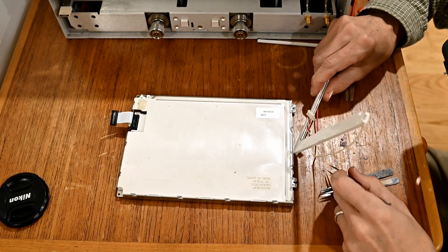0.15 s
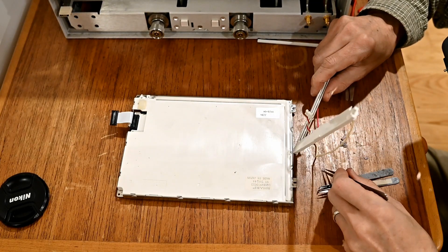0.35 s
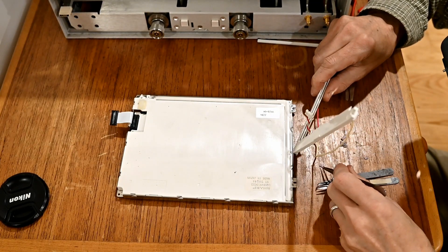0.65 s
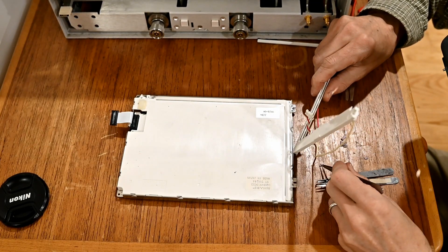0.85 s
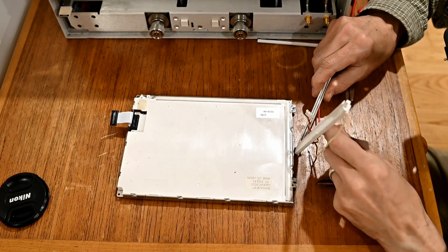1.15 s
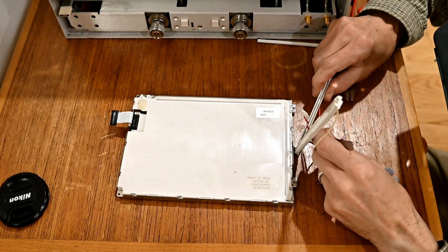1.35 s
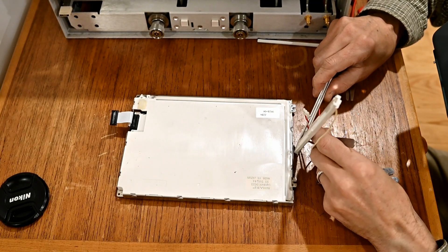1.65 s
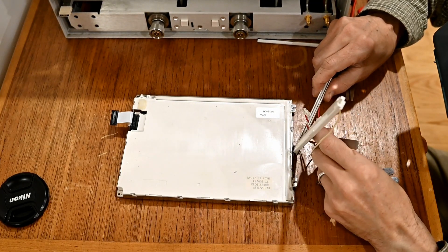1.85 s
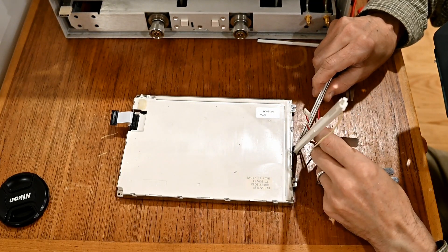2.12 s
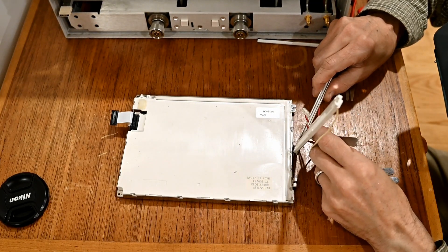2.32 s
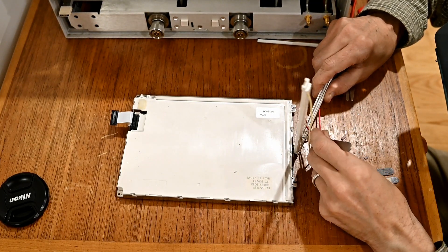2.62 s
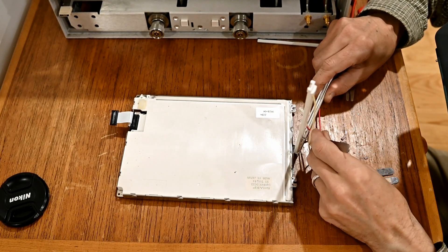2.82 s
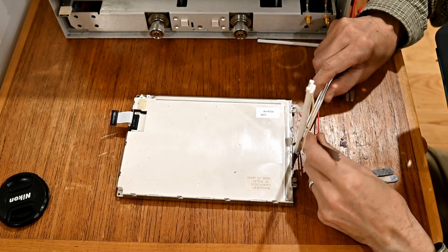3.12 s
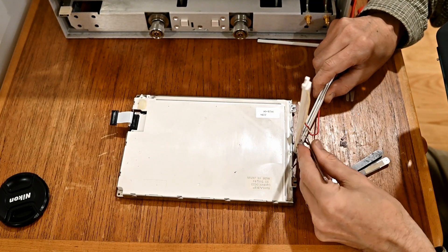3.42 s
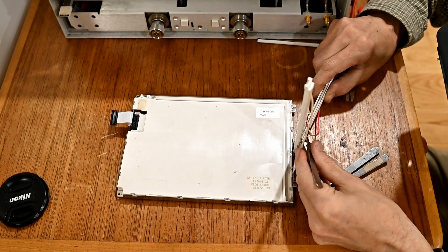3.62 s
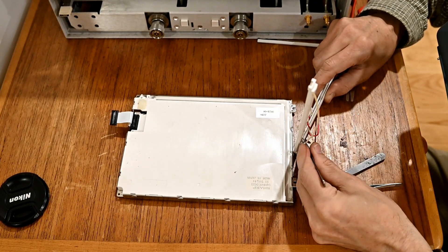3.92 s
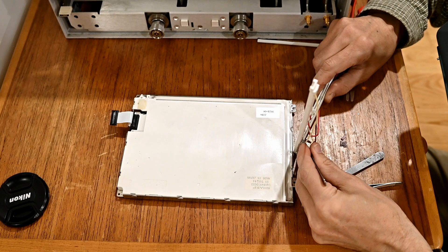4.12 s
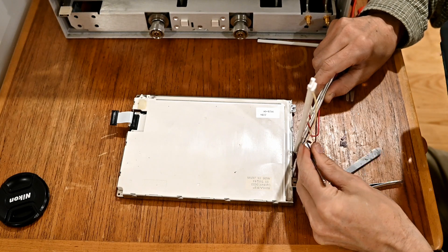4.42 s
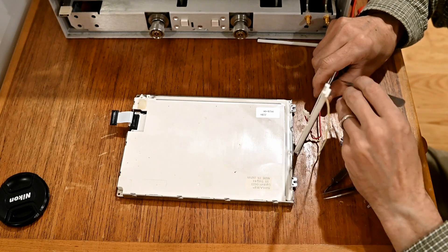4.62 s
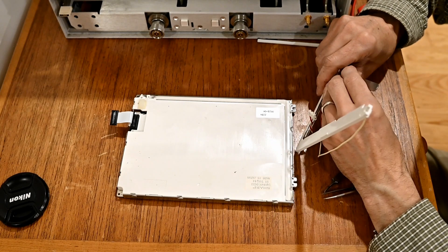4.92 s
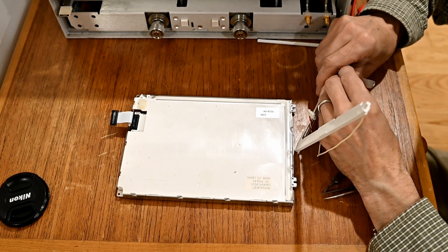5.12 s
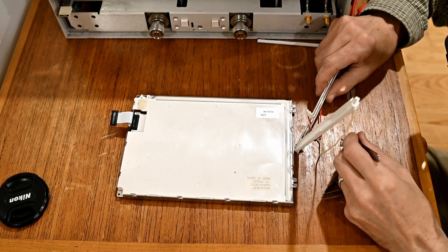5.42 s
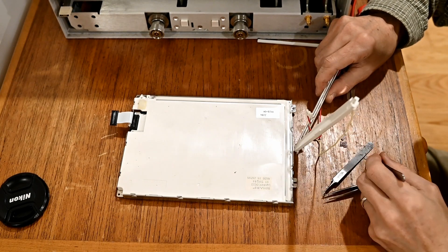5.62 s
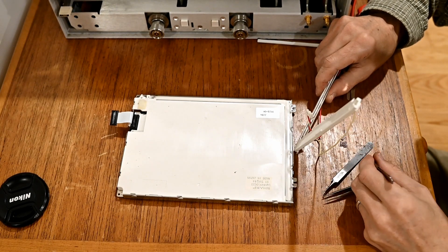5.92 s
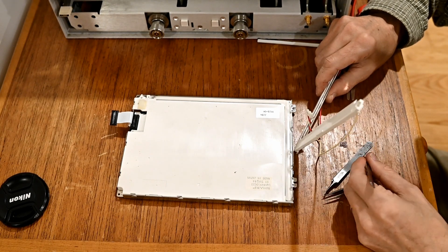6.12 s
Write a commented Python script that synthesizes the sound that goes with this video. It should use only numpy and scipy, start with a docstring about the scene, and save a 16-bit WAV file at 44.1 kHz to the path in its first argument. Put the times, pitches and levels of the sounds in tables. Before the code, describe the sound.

A small quiet indoor room, heard close in stereo, with a very faint airy hush and barely audible thin steady tones. Sleeves and fingers rustle softly on and off. From 0.04 to 0.4 seconds steel tools touch in a rapid cluster, sharpest at 0.26, with a brief drag. Sparse faint ticks and scrapes follow until a firmer clink and a crisp foil snap at 1.9. From 2.15 to 3.1 foil and plastic crackle in tiny snaps and slides, ending with a strong snap at 3.07. More snapping comes around 3.5. At 3.92 two nearly joined, very bright steel clicks are the loudest moment. Another crackle and tight clink cluster falls at 4.4 to 4.75, with a rustle. Afterwards only light touches remain, a faint slide at 5.4, a short metal drag and tick at 5.77, and a last tiny tick at 6.0. Every contact is dry and very short, with a slight room echo.

```python
"""Hands work with steel tweezers and small parts on a wooden bench in a small quiet room.
A faint hush with three thin tones lies under everything, and sleeves and fingers rustle on and off.
First steel tools clink and drag on the bench; from about two seconds foil and plastic also snap and slide.
The hardest clinks come near four seconds, and small touches and drags go on until about six.
Touches are bursts of noise that ring decaying sines; hush and rustle are filtered noise; a short echo is added."""
import sys
import numpy as np
from scipy import signal
from scipy.io import wavfile

SR = 44100
rng = np.random.default_rng(int(sys.argv[2]) if len(sys.argv) > 2 else 0)


def generate_wav(signal):
    """Clip the signal to [-1, 1] and save it as 16-bit WAV at the path in sys.argv[1]."""
    frames = np.transpose(np.atleast_2d(signal))
    scaled = np.clip(frames, -1, 1) * 32767
    pcm = np.round(scaled).astype(np.int16)
    wavfile.write(sys.argv[1], SR, pcm)


N = 276066  # length in samples

# In the touch tables level_db is a relative loudness: a longer touch also comes out louder.
# Tilt is the treble slope around 4000 Hz. Dullness weakens both far ends; below zero it counts as none.

# Room hush, shape of its spectrum: pitch_hz, relative_level_db (per Hz)
HUSH_SPECTRUM = [(15, -50), (25, -15), (108, -12.5), (313, -0.5), (358, -7.5), (410, -6), (524, 0),
                 (1360, -1.5), (1470, 0), (1730, 6.5), (1980, -5), (15200, -5.5), (16500, -35)]
# How alike left and right are in the hush: pitch_hz, likeness (1 = the same, 0 = unrelated)
HUSH_LIKENESS = [(60, 0.68), (240, 0.88), (950, 0.81), (3770, 0.15), (15000, 0.18)]
# Thin steady tones in the hush: pitch_hz, level_db (rms)
HUSH_TONES = [(360.7, -88), (527.6, -87), (872.1, -87)]
# Loudness curve of moving sleeves and fingers: time_s, level_db
RUSTLE_LEVELS = [(0.0, -67), (0.19, -64.5), (0.37, -75.5), (1.62, -75), (1.85, -74.5), (2.21, -73.5),
                 (3.33, -71.5), (3.47, -67), (4.39, -74), (4.53, -68.5), (4.71, -86), (4.76, -60.5),
                 (5.04, -73.5), (5.2, -73), (5.67, -68), (5.94, -76.5), (6.26, -73)]
# Steel tools touching: start_s, level_db, tilt_db_per_octave, dullness_db_per_octave_squared,
# bench_db (bench knock compared with the steel)
CLINK_EVENTS = [(0.0402, -34, -3.5, -3, -8), (0.149, -45, 0, -2, -14), (0.1905, -42.5, -4, 1, -19),
                (0.207, -32.5, -1.5, 0.2, -28), (0.2568, -18.5, 1, 0.5, -31.5),
                (0.2694, -27.5, 1.2, -2.3, -19), (0.2933, -30.5, -2.5, 13, -31),
                (0.3165, -38, -2.5, 2, -29), (0.3577, -41, -14, 8, -17), (0.3704, -42, -14, 6, -9.5),
                (0.3835, -48, -4, 3.5, -19), (0.846, -49, -14, 4.5, -19), (0.9276, -50, -3, -2, -23),
                (1.188, -44, -7, 2.5, -19), (1.3033, -48, -3.5, 2.5, -10), (1.326, -46, -5, 3.5, -13),
                (1.36, -51, 3, 8, -22), (1.44, -53.5, -2, 4, -12), (1.693, -49, -4, -4, -9),
                (1.803, -51.5, -16, 7, -17), (1.8746, -31.5, -2.5, -2.5, -11.5),
                (1.946, -43.5, -9, 3.5, -19), (3.4184, -38.5, 3, 3.5, -31), (3.4328, -36, -2, 5.5, -10.5),
                (3.8426, -39, -5, 1.5, -9), (3.894, -35.5, 5, 36, -16), (3.919, -8.5, 5, 5.8, -31),
                (3.929, -12, 3.5, 1.2, -41), (4.081, -46, -17, 11.5, -33.5),
                (4.2172, -50.5, -7.5, 2.2, -10), (4.4886, -45, -6.5, 4.5, -13), (4.6343, -23.5, 0, 16, -34),
                (4.6368, -20.5, 2.5, 3.5, -33), (4.6404, -22, -4.2, 5, -30), (4.7454, -21.5, -4, 5.5, -36),
                (4.8523, -43, 6, 5, -12), (4.879, -41.5, 2, 1.5, -11), (4.93, -51, -9, 3.5, -8),
                (4.99, -54, -16, -2, -6), (5.095, -53.5, -17, 5.5, -12), (5.1312, -48.5, -2.5, 4, -21),
                (5.25, -51.5, -17, -5, -7), (5.28, -42.5, -3.5, 1, -19), (5.2964, -49, -6, 2, -21),
                (5.624, -48.5, -11, 8, -26), (5.7739, -36, -5, -2, -24), (5.7994, -42, -12, 8, -18),
                (6.002, -52.5, -10, 2, -13)]
# Steel dragged over the bench: start_s, level_db, tilt_db_per_octave
DRAG_EVENTS = [(0.162, -48, 22), (0.698, -45.5, 1), (0.722, -49, 0), (0.937, -45.5, -4), (5.6014, -48, -13),
               (5.7638, -33.5, -8)]
# Foil and plastic snapping: start_s, level_db, tilt_db_per_octave, thud_db (thud compared with the foil)
SNAP_EVENTS = [(1.891, -16, 1.5, -25), (2.1466, -26, 2.2, -12), (2.205, -37, -1.3, -18),
               (2.2453, -40, 8, -25), (2.2943, -37.5, 0, -16), (2.3316, -44, 6, -24),
               (2.354, -42, -1.5, -19), (2.3971, -38, 3, -25), (2.5247, -49, 8, -18), (2.5496, -38, 3, -8),
               (2.587, -40, -2, -25), (2.5957, -37.5, 1.5, -4.5), (2.6865, -38.5, 0.5, -32),
               (2.7038, -40.5, 0.5, -39), (2.8314, -35.5, 1, -16), (2.9451, -36.5, -1, -24),
               (3.0731, -16, 1.2, -16.5), (3.496, -35, -2.3, -20), (3.5267, -23.5, 0.5, -18),
               (3.5944, -37, 6, -36), (3.6157, -45, 9, -30), (3.6704, -45, 4, -28), (3.704, -45, 11, -30),
               (3.716, -43, 11, -30), (3.6855, -46, -1, -28), (3.8272, -48, -4, -31), (4.3832, -40, 3, -33),
               (4.4057, -39, 2, -31), (4.566, -36.5, 11, -24), (4.588, -30.5, -1.5, -13)]
# Foil sliding: start_s, level_db, length_s, tilt_db_per_octave
SLIDE_EVENTS = [(2.517, -49.5, 0.022, -1), (2.5514, -44.5, 0.024, -1.2), (2.571, -45.5, 0.015, -1),
                (2.5997, -30, 0.032, 1.5), (2.6214, -52, 0.021, 2), (2.818, -46, 0.0086, 2.5),
                (2.911, -54.5, 0.015, 3), (2.969, -53, 0.014, 1), (3.038, -44, 0.023, 3),
                (3.1093, -35, 0.0079, 2), (3.3944, -45, 0.015, 0.5), (3.517, -34.5, 0.01, -0.3),
                (3.5323, -38.5, 0.016, -0.5), (3.645, -32, 0.0085, 0.8), (4.4398, -38.5, 0.01, 2.2),
                (4.797, -53.5, 0.064, 0.5), (5.4165, -51.5, 0.037, 0.5), (5.449, -54, 0.034, 0.5)]
# Ways the steel tools ring: pitch_hz, level_db, t60_s (time to fade by 60 dB)
STEEL_MODES = [(1254, -10, .02), (1500, -10, .008), (1970, -7, .006), (2570, -5, .007), (3100, -4, .006),
               (3630, -4, .005), (4070, -3, .007), (4500, -3, .006), (4990, -3, .005), (5640, -4, .006),
               (6400, -3, .004), (7200, -3, .004), (8100, -3, .003), (9150, -3, .004), (10100, -2, .003),
               (11400, -2, .0035), (12400, -2, .003), (13400, -2, .003), (14400, -2, .003),
               (15400, -2, .003)]
# Ways the wooden bench rings: pitch_hz, level_db, t60_s
BENCH_MODES = [(420, -10, .035), (650, -1, .08), (1100, -5, .03)]
# Ways the foil and plastic ring: pitch_hz, level_db, t60_s
FOIL_MODES = [(450, -9, .008), (900, -6, .004), (1500, -5, .004), (2200, -4, .003), (3300, -3, .002),
              (4800, -1, .0015), (6600, -1, .0015), (8200, -1, .0015), (9800, -1, .0015),
              (11500, -1, .0015), (13200, -1, .0015), (15000, -1, .0015)]
# Ways the casing under the foil rings: pitch_hz, level_db, t60_s
CASING_MODES = [(39.8, 4, 0.028), (89.5, -4, 0.03), (194, 6, 0.014), (320, -15, 0.017), (676, -3.5, 0.014)]

HUSH_DB = -65.5  # rms level, without the tones
CLINK_CONTACT_S, CONTACT_SHRINK = 0.0031, 0.084  # length at -40 dB; dB shorter per dB harder
DRAG_CONTACT_S, DRAG_DULL_DB, DRAG_BENCH_DB = 0.012, 12, -36
SNAP_CONTACT_S, SNAP_DULL_DB = 0.0013, 0.4
SLIDE_DULL_DB, SLIDE_THUD_DB = 0, -23
ROOM_T60_S, TREBLE_T60_S, WALL_CUT_HZ, ROOM_DB = 0.18, 0.21, 17000, -4  # treble fades by both times
CUTOFF_HZ = 16800


def from_db(db):
    """Turns decibels into a plain multiplier."""
    return 10 ** (np.asarray(db) / 20)


def rms_one(x):
    """Scales a sound to an rms (average strength) of 1."""
    return x / np.sqrt(np.mean(x ** 2) + 1e-20)


def at_hz(points, hz):
    """Reads a table of pitches and values, moving between pitches as the ear does, on a log scale."""
    pitches, values = np.transpose(points)
    return np.interp(np.log(hz), np.log(pitches), values)


def drift(rate_hz):
    """Makes slow random wandering of spread 1 by smoothing noise twice, one value per 40 samples."""
    step = 40
    r = np.exp(-2 * np.pi * rate_hz * step / SR)
    noise = rng.standard_normal(N // step + 2002)
    slow = signal.lfilter([1], [1, -2 * r, r * r], noise)[2000:]  # skip the filter's start-up
    return np.interp(np.arange(N) / step, np.arange(len(slow)), rms_one(slow))


def rings(modes, detune=1):
    """Gives each mode a fading sine that swells over its first cycle or two; neighbours are flipped."""
    hz, db, t60 = np.transpose(modes)[:, :, None]
    t = np.arange(SR // 10) / SR
    flip = (-1) ** np.arange(len(modes))[:, None]
    fade = from_db(db - 60 * t / t60)
    swell = 1 - np.exp(-hz * t)
    return flip * fade * swell * np.sin(2 * np.pi * hz * detune * t)


def touches(events, modes, under, thin_hz, grain_db, rise, squareness):
    """Makes each touch a chatter of tiny impacts that rings the object and what lies under it."""
    out = np.zeros((2, N + SR))
    t = np.arange(SR // 10) / SR
    thin = signal.butter(4, thin_hz, "high", fs=SR, output="sos")  # small parts give off no bass
    under_rings = rings(under)
    octaves = np.log2(np.array(modes)[:, 0] / 4000)
    for start_s, level_db, contact_s, tilt_db, dull_db, under_db in events:
        # The push rises, then dies away; random grains make it rough.
        phase = t / contact_s
        force = (1 - np.exp(-phase / rise)) * np.exp(-phase ** squareness)
        grain_size = np.minimum(rng.exponential(1, len(t)), 5)
        chatter = force * rng.standard_normal(len(t)) * from_db(grain_db * grain_size)

        # Each spot stirs the modes differently, and the grip shifts their pitch a little.
        chance_db = 2 * rng.standard_normal(len(modes))
        colour = from_db(tilt_db * octaves - max(dull_db, 0) * octaves ** 2 + chance_db)
        detune = 1 + chance_db[::-1, None] / 100
        body = signal.sosfilt(thin, colour @ rings(modes, detune))
        below = from_db(4 * rng.standard_normal(len(under))) @ under_rings

        sound = signal.fftconvolve(chatter, body)
        knock = signal.fftconvolve(chatter, below)
        sound = sound / np.linalg.norm(sound)
        knock = from_db(under_db) * knock / np.linalg.norm(knock)
        parts = np.array([sound, knock]) * np.linalg.norm(force) / 2

        # The wide surface below can sound further off centre than the object.
        lean = rng.standard_normal(2) * [0.06, 0.25]
        both_ears = (1 + np.outer([1, -1], lean)) @ parts
        at = round(start_s * SR)
        out[:, at:at + len(sound)] += from_db(level_db) * both_ears
    return out[:, :N]


def hush_tones():
    """Adds up thin sines whose levels waver slowly."""
    t = np.arange(N) / SR
    tones = np.zeros(N)
    for hz, db in HUSH_TONES:
        tones += from_db(db + 1.15 * drift(2)) * np.sqrt(2) * np.sin(2 * np.pi * hz * t)
    return tones


def hush(patchy_db):
    """Builds stereo noise from half-octave bands, each with its own level, flicker and likeness."""
    out = np.zeros((2, N))
    edges = 25 * 2 ** np.arange(0, 9.9, 0.5)
    white = rng.standard_normal((2, 2, N))
    for k, (low, high) in enumerate(zip(edges, edges[1:])):
        band = signal.butter(2, [low, high], "band", fs=SR, output="sos")
        mid, side = signal.sosfilt(band, white[k % 2])  # neighbouring bands use different noise
        hz = np.sqrt(low * high)
        alike = at_hz(HUSH_LIKENESS, hz)
        gain = from_db(at_hz(HUSH_SPECTRUM, hz) + patchy_db * drift(25))
        out += gain * (np.sqrt(1 + alike) * mid + np.sqrt(1 - alike) * side * [[1], [-1]])
    return from_db(HUSH_DB) * rms_one(out) + hush_tones()


def rustle():
    """Lets cloth and skin rub as clumps of tiny dull noise grains."""
    grain_db = 3.0 * np.minimum(rng.exponential(1, N), 5)
    clump_db = 3 * drift(12)
    grains = rng.standard_normal(N) * from_db(grain_db + clump_db)
    band = signal.butter(2, [900, 4500], "band", fs=SR, output="sos")
    level_db = np.interp(np.arange(N) / SR, *np.transpose(RUSTLE_LEVELS))
    return from_db(level_db) * rms_one(signal.sosfilt(band, grains))


def clinks():
    """Makes short steel contacts, the harder the shorter, that also knock the bench."""
    rows = []
    for start_s, db, tilt, dull, bench in CLINK_EVENTS:
        contact_s = CLINK_CONTACT_S * from_db(-CONTACT_SHRINK * (db + 40))
        rows.append((start_s, db, contact_s, tilt, dull, bench))
    return touches(rows, STEEL_MODES, BENCH_MODES, thin_hz=1050, grain_db=3.0, rise=0.067, squareness=1.13)


def drags():
    """Rubs steel on wood in longer touches with soft edges."""
    rows = [(s, db, DRAG_CONTACT_S, tilt, DRAG_DULL_DB, DRAG_BENCH_DB) for s, db, tilt in DRAG_EVENTS]
    return touches(rows, STEEL_MODES, BENCH_MODES, thin_hz=930, grain_db=4.0, rise=0.76, squareness=1.1)


def snaps():
    """Lets a crease give way in a very short burst that knocks the casing."""
    rows = [(s, db, SNAP_CONTACT_S, tilt, SNAP_DULL_DB, thud) for s, db, tilt, thud in SNAP_EVENTS]
    return touches(rows, FOIL_MODES, CASING_MODES, thin_hz=154, grain_db=3.0, rise=0.33, squareness=0.89)


def slides():
    """Scrapes the foil fairly evenly for the length of each slide."""
    rows = [(*slide, SLIDE_DULL_DB, SLIDE_THUD_DB) for slide in SLIDE_EVENTS]
    return touches(rows, FOIL_MODES, CASING_MODES, thin_hz=150, grain_db=3.5, rise=0.4, squareness=3)


def room(x, side_db):
    """Adds dense reflections that die away, top treble fastest, nearly the same left and right."""
    t = np.arange(SR // 3) / SR
    noise = rng.standard_normal((2, len(t))) * np.minimum(t / 0.00045, 1)  # quick fade-in
    dull = signal.sosfilt(signal.butter(1, WALL_CUT_HZ, fs=SR, output="sos"), noise)
    treble = (noise - dull) * from_db(-60 * t / TREBLE_T60_S)
    tail = from_db(-60 * t / ROOM_T60_S) * (dull + treble)
    mid, side = [signal.fftconvolve(x, one / np.sqrt(np.sum(one ** 2)))[:N] for one in tail]
    return from_db(ROOM_DB) * (mid + from_db(side_db) * side * np.array([[1], [-1]]))


def scene():
    """Mixes tools, foil, hands and hush; the tools stir the room more than the muffled foil."""
    tools = clinks() + drags()
    foil_and_hands = snaps() + slides() + rustle()
    into_room = (tools + from_db(-11.5) * foil_and_hands).mean(axis=0)
    echo = room(into_room, side_db=-57)
    return tools + foil_and_hands + echo + hush(patchy_db=1.3)


def record(dry):
    """Cuts off the very top of the treble steeply."""
    return signal.sosfilt(signal.cheby2(14, 75, CUTOFF_HZ, fs=SR, output="sos"), dry)


dry = scene()
out = record(dry)
generate_wav(out)
```